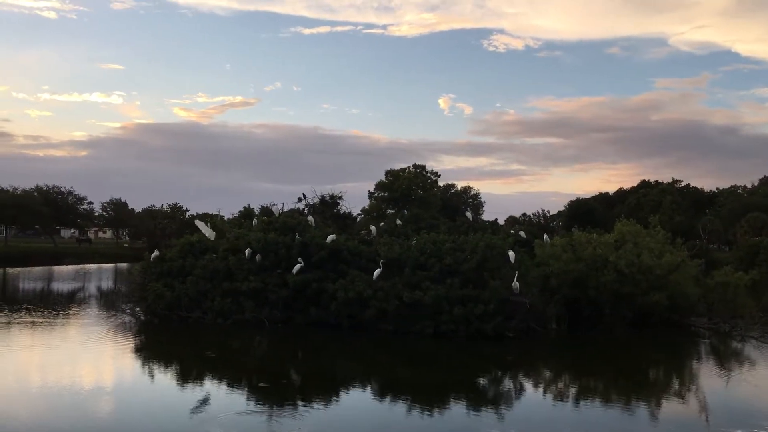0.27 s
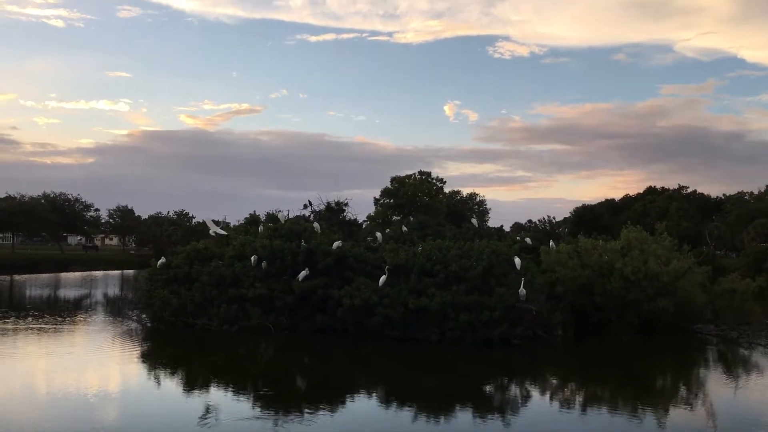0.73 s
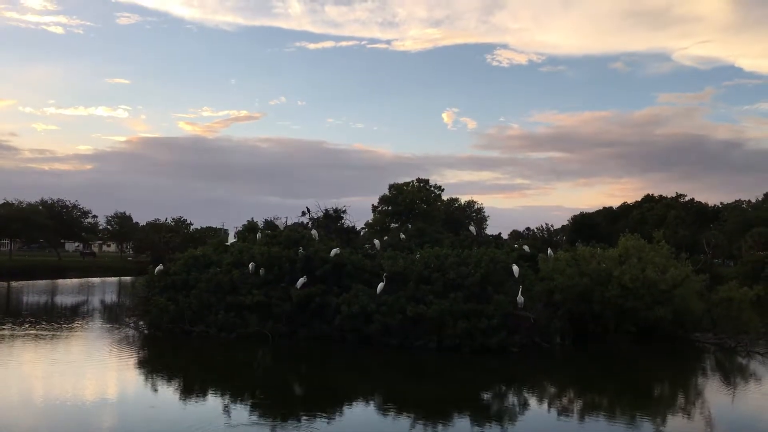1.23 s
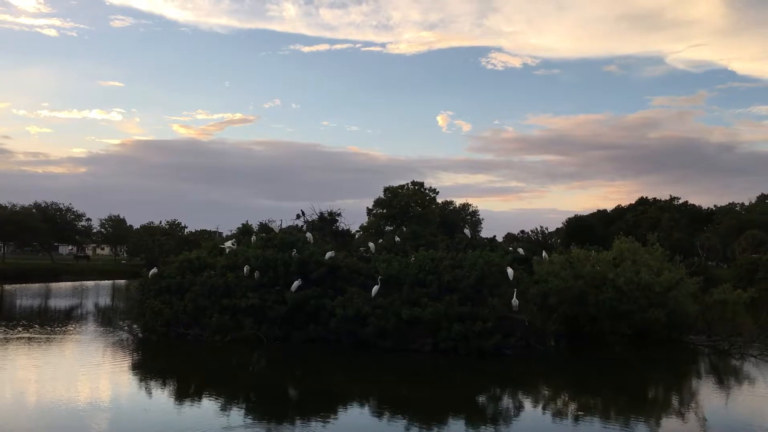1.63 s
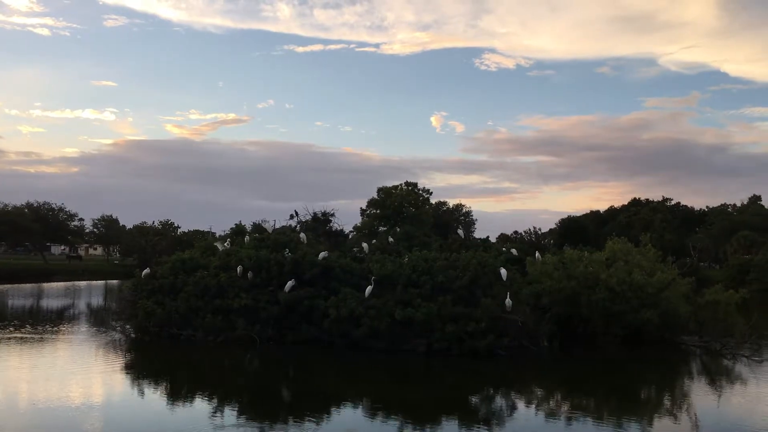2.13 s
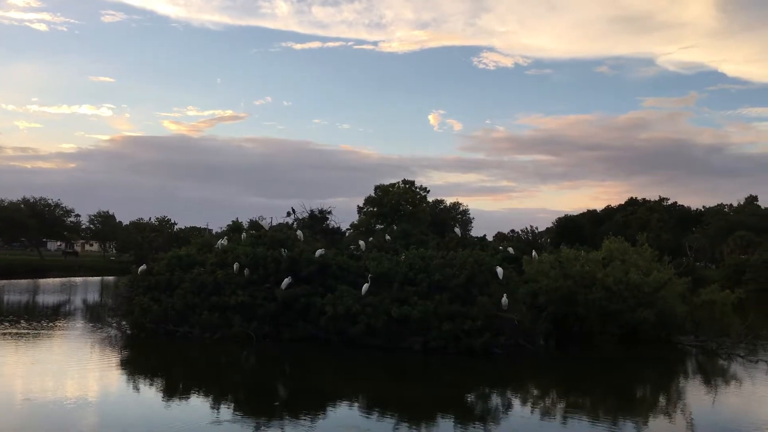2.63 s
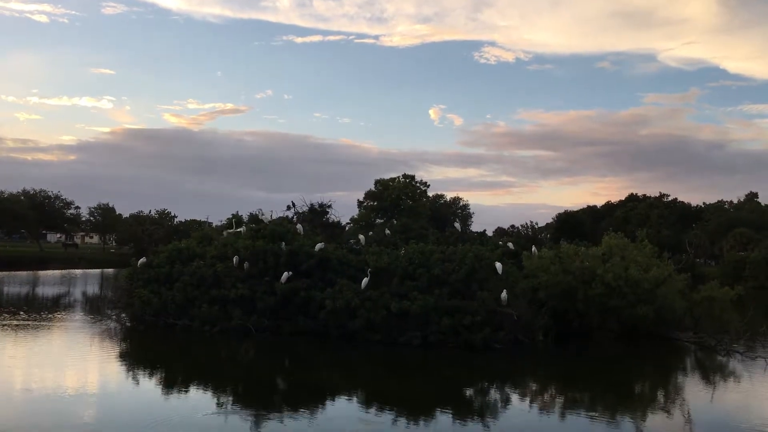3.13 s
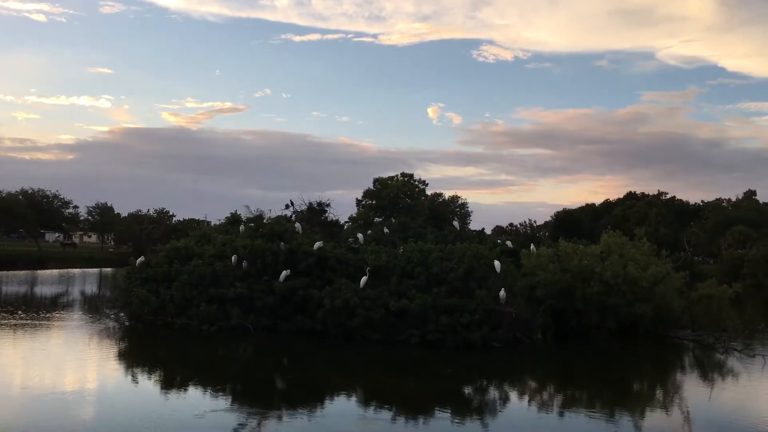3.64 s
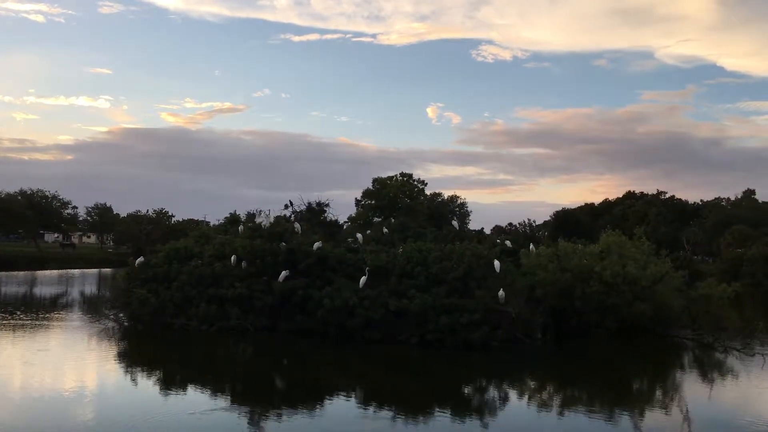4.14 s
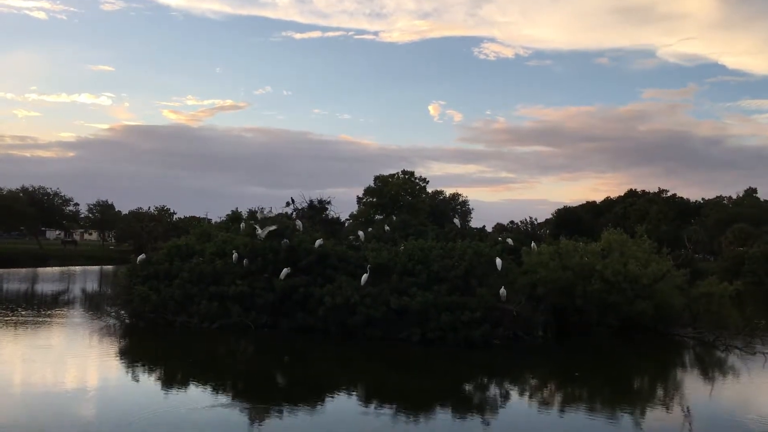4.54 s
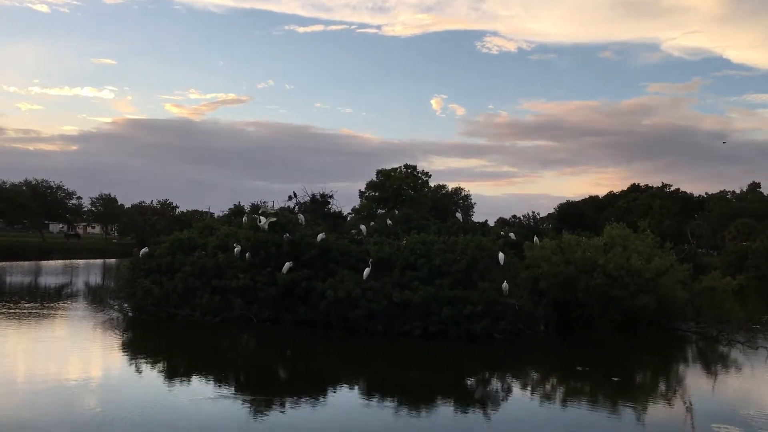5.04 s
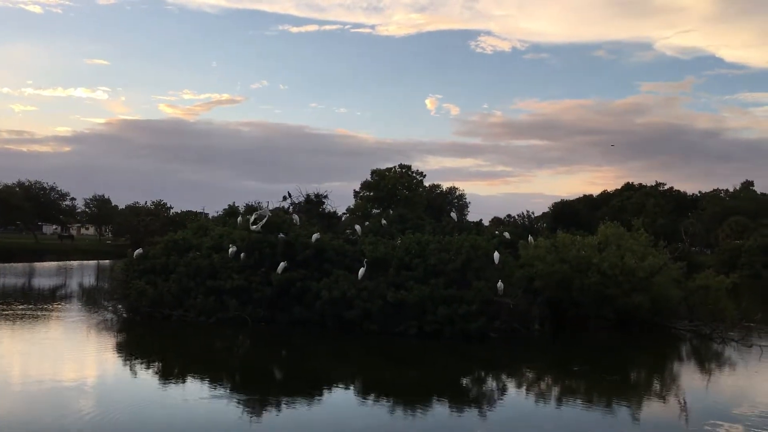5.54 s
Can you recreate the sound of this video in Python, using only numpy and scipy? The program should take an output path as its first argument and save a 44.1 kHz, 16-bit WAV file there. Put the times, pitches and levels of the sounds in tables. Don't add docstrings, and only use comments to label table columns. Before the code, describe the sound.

Clear, sliding duck whistles and squeals crowd the first half second and then thin out. From the start, heron and egret chicks on the island give short nasal honks about four a second, mixed with adult grunts, harsh rasps and beak snaps. A cricket trill flares mid-way and bills rattle soon after. Outdoor lake at dusk, soft leafy echoes, low traffic rumble, a phone microphone on the shore.

```python
import sys
import numpy as np
from scipy import signal
from scipy.fft import rfft, irfft
from scipy.io import wavfile
from scipy.ndimage import uniform_filter1d

SR = 44100
rng = np.random.default_rng(int(sys.argv[2]) if len(sys.argv) > 2 else 0)


def store_pcm(level_fs):
    pcm = np.round(np.clip(level_fs, -1, 1) * 32767).astype(np.int16)
    wavfile.write(sys.argv[1], SR, np.atleast_2d(pcm).T)


def invert_db(x):
    u = np.asarray(x, float) / 20
    return 10 ** u


N = 254898
TIME = np.arange(N) / SR


def shaped(count, hz, db):
    f = np.maximum(np.fft.rfftfreq(count, 1 / SR), 1)
    colour = invert_db(np.interp(np.log(f), np.log(hz), db))
    y = irfft(rfft(rng.standard_normal(count)) * colour, count)
    return y / y.std()


def walk(count, rate):
    k = max(int(SR / rate), 2)
    noise = rng.standard_normal(count + 4 * k)
    smooth = uniform_filter1d(uniform_filter1d(noise, k), k)[2 * k:2 * k + count]
    return smooth * np.sqrt(1.5 * k)


def waver(count, rate):
    y = walk(count, rate)
    return y - y.mean()


def read(table, fade_s=0.0063, tail_s=0.0087):
    s, *columns = np.transpose(table)
    t = np.arange(max(s[0] - fade_s, 0), s[-1] + tail_s, 1 / SR)
    fade_in = np.clip((t - s[0]) / fade_s + 1, 0, 1)
    fade_out = np.clip((s[-1] - t) / tail_s + 1, 0, 1)
    return int(t[0] * SR), (fade_in * fade_out) ** 2, [np.interp(t, s, c) for c in columns]


def add(out, start, x):
    x = x[:max(N - start, 0)]
    out[start:start + len(x)] += x


def ring(x, hz, width_hz):
    sos = signal.butter(1, [hz - width_hz / 2, hz + width_hz / 2], "band", fs=SR, output="sos")
    return signal.sosfilt(np.vstack([sos, sos]), x)


def breath(count):
    beat = np.cumsum(500 * (1 + .04 * walk(count, 120))) / SR % 1
    puff = np.exp(-beat / .06)
    air = rng.standard_normal(count) * (.12 + .5 * np.exp(-beat / .3))
    return (puff + air) * invert_db(3 * walk(count, 90))


# pitch_hz, level_db (per Hz)
DUSK_COLOUR = [(15, -48), (25, -1), (75, 5.5), (298, -10), (471, -18.5), (651, -11.5), (1180, -10),
               (1630, -14), (1970, -20), (3650, -20.5), (4910, -31.5), (5930, -35), (15600, -49)]
# time_s, level_db
FAR_CHORUS = [(0, -35), (.09, -40), (.15, -50), (.23, -40), (.36, -40), (.47, -43), (.57, -42.5),
              (.66, -55.5), (1.8, -53.5), (2.1, -66), (2.6, -59), (3.2, -59), (4, -53), (4.33, -52.5),
              (4.41, -58), (4.63, -57), (4.8, -58), (5.78, -58.5)]
# time_s, level_db
ENGINE_HUM = [(0, -59), (.3, -47), (.8, -49.5), (1.1, -59.5), (1.95, -47.5), (2.1, -56.5), (5.78, -70.5)]


def dusk():
    blur = shaped(N, *np.transpose(DUSK_COLOUR))
    chorus_db = np.interp(TIME, *np.transpose(FAR_CHORUS)) + 60
    spectrum, f, out = rfft(blur), np.fft.rfftfreq(N, 1 / SR), 0
    for low in 2 ** np.arange(4, 15):
        band = irfft(spectrum * ((f >= low) & (f < 2 * low)), N)
        flicker_db = 1.0 if low < 500 else 1.4
        chorus_share = np.interp(low, [1000, 2000, 4000, 9000], [0.091, 0.44, 0.87, 0.43])
        out = out + band * invert_db(flicker_db * walk(N, 9.6) + chorus_db * chorus_share)
    phase = 2 * np.pi * np.cumsum(103.5 * (1 + 0.014 * walk(N, 7.9))) / SR
    engine_db = np.interp(TIME, *np.transpose(ENGINE_HUM)) + 2.0 * walk(N, 4.45)
    whine = invert_db(-66) * np.sin(2 * np.pi * 297 * TIME + 1.52 * walk(N, 4.92))
    return out * invert_db(-49.5) + np.sin(phase) * invert_db(engine_db) + whine


# time_s, level_db
CRICKET_LEVEL = [(0, -48), (2.5, -75), (2.58, -56), (3.05, -57), (3.3, -78), (5.78, -56.5)]


def cricket():
    stroke = np.cumsum(27.0 * (1 + 0.0303 * walk(N, 3.43))) / SR % 1
    push = np.exp(-((stroke - .5) / .15) ** 2) * invert_db(4 * walk(N, 12))
    ticks = ring(rng.standard_normal(N), 3980, 350) * (.25 + push)
    return ticks / ticks.std() * invert_db(np.interp(TIME, *np.transpose(CRICKET_LEVEL)) - 7.5)


# start_s, level_db
CRICKET_STROKES = [(2.5399, -52), (2.5733, -47), (2.6127, -45), (2.683, -47), (2.7199, -48), (2.7833, -44),
                   (2.8561, -50), (2.8901, -52), (2.9305, -51), (2.9579, -49), (3.0093, -50), (3.0372, -46)]


def chirps():
    out, t = np.zeros(N), np.arange(0, .02, 1 / SR)
    swell = np.sin(np.pi * t / t[-1]) ** 2
    for s, db in CRICKET_STROKES:
        detune, turn = rng.standard_normal(2)
        tone = np.sin(2 * np.pi * 3980 * (1 + .015 * detune) * t + turn)
        add(out, int((s - .003) * SR), swell * tone * invert_db(db - 3.0))
    return out


# start_s, level_db
SQUABBLE = [(3.4146, -43), (3.4244, -45), (3.4535, -49), (3.5024, -57), (3.5912, -55), (3.691, -51),
            (3.6964, -50), (3.7094, -51), (3.7234, -53), (3.7374, -50), (3.7574, -50), (3.7743, -47),
            (3.7854, -50), (3.7954, -52), (3.8114, -51), (3.8294, -54), (3.8494, -56), (3.8744, -53),
            (3.9644, -61), (4.0472, -53)]
# start_s, level_db
LATE_SQUABBLE = [
    (5.3208, -48),
    (5.3861, -50),
    (5.4804, -59),
]


def rattle():
    out, t = np.zeros(N), np.arange(0, .02, 1 / SR)
    for s, db in list(SQUABBLE) + list(LATE_SQUABBLE):
        tick = rng.standard_normal(len(t)) * np.exp(-t / 0.0029)
        dry_tick = ring(tick, 6400, 3000) + .4 * ring(tick, 10000, 6000)
        add(out, int(s * SR), dry_tick / abs(dry_tick).max() * invert_db(db - 6))
    return out


# start_s, level_db
BEAK_SNAPS = [
    (1.807, -40),
    (1.817, -38),
    (1.826, -48.5),
    (3.414, -38),
    (3.692, -42),
    (3.777, -55),
]


def snaps():
    out, t = np.zeros(N), np.arange(0, .03, 1 / SR)
    for s, db in BEAK_SNAPS:
        tick = rng.standard_normal(len(t)) * np.exp(-t / 0.0023)
        bill = ring(tick, 3230, 700) + 0.46 * ring(tick, 4430, 700) + 0.32 * ring(tick, 5600, 900)
        add(out, int((s - .002) * SR), bill / abs(bill).max() * invert_db(db))
    return out


# start_s, beak_level_db, body_level_db (relative to the beak)
SHORT_RASPS = [(1.1709, -37.5, 2.5), (1.4375, -37, -6.5), (1.677, -39, 9), (1.765, -62, 22),
               (1.815, -54, 25), (1.9998, -40, 8), (2.1387, -38, 1), (2.3694, -47, 17.5), (2.552, -43, 14),
               (2.727, -65, 23), (2.8022, -50, 26.5), (3.251, -51, 11), (3.411, -37, 10), (3.454, -45, -1),
               (3.688, -41, 7), (3.774, -45, -3), (4.069, -39, 1), (4.3096, -45.5, 16.5), (4.536, -36, 6.5),
               (4.6932, -47.5, 19), (4.761, -36, 7), (4.832, -57, 22), (4.994, -38, 6), (5.156, -43, 12),
               (5.2345, -42, 9), (5.468, -44, 16), (5.657, -41, 11)]


def rasps():
    out, t = np.zeros(N), np.arange(0, .16, 1 / SR)
    shape = np.clip(t / .008, 0, 1) * np.exp(-(t / .034) ** 2)
    for s, db, body_db in SHORT_RASPS:
        air = breath(len(t))
        beak = ring(air, 5660, 966) + .5 * ring(air, 4230, 500) + 0.078 * ring(air, 12200, 3800)
        body = ring(ring(air, 3030, 2000), 3200, 2800) + .5 * ring(air, 3430, 280)
        both = beak / np.std(beak[:2000]) + invert_db(body_db - 1.5) * body / np.std(body[:2000])
        add(out, int(s * SR), shape * invert_db(db - 17.5) * both)
    return out


# start_s, length_s, level_db
LONG_HISSES = [
    (3.046, 0.029, -47),
    (4, 0.086, -48.5),
    (2.5, 0.04, -52),
    (3.69, 0.21, -51.5),
    (5.31, 0.19, -49),
]
HISS_START_DB, HISS_END_DB = -5, -8


def hisses():
    out = np.zeros(N)
    for s, length, top_db in LONG_HISSES:
        table = [(s, top_db + HISS_START_DB), (s + .3 * length, top_db), (s + length, top_db + HISS_END_DB)]
        start, gate, (db,) = read(table, fade_s=0.0082, tail_s=0.0183)
        air = breath(len(db))
        beak = ring(air, 4600, 4200) + 1.1 * ring(air, 3980, 350)
        beak = beak + 0.5 * ring(air, 4620, 280) + 0.85 * ring(air, 5600, 490)
        top = ring(air, 9100, 7700)
        add(out, start, gate * invert_db(db - 3.5) * (beak / beak.std() + invert_db(-22) * top / top.std()))
    return out


# peak_s, length_s, throat_hz, level_db
ADULT_GRUNTS = [(0.888, 0.017, 940, -54.5), (1.32, 0.099, 1065, -53.5), (2.46, 0.12, 1100, -53.5),
                (3.402, 0.065, 1030, -49.5), (3.431, 0.027, 1480, -49), (3.601, 0.04, 1145, -50.5),
                (1.731, 0.059, 1300, -52.5), (2.682, 0.073, 960, -61), (5.26, 0.019, 1930, -48.5),
                (5.312, 0.013, 1076, -42.5), (5.345, 0.17, 1134, -44.5), (5.394, 0.04, 1547, -49),
                (5.543, .04, 1000, -58), (5.763, .03, 1100, -57), (1.16, 0.048, 1120, -46),
                (0.85, 0.028, 1060, -52.5), (1.1, 0.047, 1200, -57), (0.745, 0.018, 1480, -50),
                (2.8, 0.021, 1170, -46.5), (3.79, 0.023, 1200, -49), (2.735, 0.011, 1850, -53),
                (2.2, 0.035, 1200, -56)]


def grunts():
    out = np.zeros(N)
    attack_s, start_db, fade_db_per_s, sag_hz_per_s = .025, -2, 18, 364
    for s, length, top_hz, top_db in ADULT_GRUNTS:
        end = (s + length, top_hz - sag_hz_per_s * length, top_db - fade_db_per_s * length)
        path = [(s - attack_s, top_hz, top_db + start_db), (s, top_hz, top_db), end]
        start, gate, (hz, db) = read(path)
        n = len(hz)
        flap = np.cumsum(68 * (1 + 0.22 * walk(n, 28.0))) / SR % 1
        puff = 0.6 + np.sin(np.pi * flap) ** 2 * invert_db(3.0 * walk(n, 90))
        phase = 2 * np.pi * np.cumsum(hz * (1 + .05 * walk(n, 400))) / SR
        rough = 0.18 * walk(n, 310) * np.sin(1.6 * phase) + 0.072 * walk(n, 240) * np.sin(2 * phase)
        voice = puff * (np.sin(phase) + rough)
        add(out, start, voice / voice.std() * gate * invert_db(db))
    return out


# start_s, length_s, level_db
TORN_AIR = [
    (.075, .05, -63),
    (.165, .105, -55),
    (.33, .05, -56),
    (.395, 0.081, -60),
]


def shrieks():
    out = np.zeros(N)
    for s, length, top_db in TORN_AIR:
        path = [(s, top_db + HISS_START_DB), (s + length / 2, top_db), (s + length, top_db + HISS_END_DB)]
        start, gate, (db,) = read(path)
        air = rng.standard_normal(len(db)) * invert_db(3.0 * walk(len(db), 150))
        shriek = ring(air, 5500, 5500) + 0.11 * ring(air, 12500, 4000)
        add(out, start, shriek / shriek.std() * gate * invert_db(db))
    return out


SLIDE_IN_DB, SLIDE_OUT_DB = -4, -5


def slide(s, length, top_hz, db, rise, fall, up, down):
    top_s = s + min(rise / up, .95 * length)
    drop_s = max(s + length - fall / down, top_s + .001)
    end_s = max(s + length, drop_s + .001)
    return [(s, top_hz / 2 ** rise, db + SLIDE_IN_DB), (top_s, top_hz, db), (drop_s, top_hz, db),
            (end_s, top_hz / 2 ** fall, db + SLIDE_OUT_DB)]


def soft_ends(path, db):
    soft = [SLIDE_IN_DB] + [0] * (len(path) - 2) + [SLIDE_OUT_DB]
    return [(s, hz, db + d) for (s, hz), d in zip(path, soft)]


# start_s, length_s, top_hz, level_db, rise_octaves
UP_PIPES = [(1.41, 0.174, 2958, -54, 0.38)]
UP_PEEPS = [(.455, .065, 7000, -62, .07), (2.925, .06, 2130, -60, .03), (4.11, .045, 2480, -54, .13),
            (4.124, .026, 2950, -54, .05), (4.042, .018, 4050, -54, .03), (4.015, .025, 4350, -59, .02),
            (4.408, .035, 3850, -61, .04), (4.838, .025, 2750, -60, .04), (4.36, .08, 7800, -73, .1),
            (4.295, .035, 2500, -59, .04), (4.315, .03, 3380, -59, .04)]
UP_FAR = [(1.04, .04, 2380, -65, .2), (4.57, .1, 2280, -63, .45), (4.88, .045, 2270, -64, .3),
          (5.06, .04, 2400, -67, .12)]
# start_s, length_s, top_hz, level_db, fall_octaves
DOWN_PEEPS = [
    (-.02, 0.041, 4740, -44.5, 0.18),
    (3.925, 0.034, 7000, -76, 0.16),
]
# level_db, then a path of time_s, pitch_hz
PIPED = [
    (-41, [(-.04, 3200), (.02, 3130), (.085, 3080), (.098, 2950), (.11, 2550)]),
    (-45, [(.186, 3380), (.192, 3400), (.205, 3250), (.22, 3100), (.245, 2800), (.262, 2600)]),
    (-54, [(1.04, 2520), (1.1, 2630), (1.145, 2580)]),
    (-56, [(1.245, 2820), (1.3, 2830), (1.335, 2700), (1.352, 2300)]),
    (-55, [(1.685, 2780), (1.73, 2880), (1.755, 2680)]),
]
SQUEALED = [
    (-44, [(.066, 1950), (.078, 2060), (.086, 2330), (.108, 2380)]),
    (-52, [(.112, 2650), (.13, 2500), (.14, 2250), (.156, 1550), (.163, 1330)]),
    (-44, [(.165, 1325), (.183, 1400), (.19, 1600), (.2, 1850), (.215, 2100), (.222, 2300), (.232, 2370)]),
    (-47, [(.166, 1850), (.18, 2200), (.192, 2350), (.207, 2700)]),
    (-55, [(.232, 2650), (.242, 2800), (.255, 2600), (.272, 2100), (.284, 1650)]),
    (-56, [(.332, 1950), (.342, 2150), (.352, 2350)]),
    (-55, [(.37, 2750), (.385, 2500), (.398, 1950)]),
    (-43.5, [(.388, 1600), (.398, 1870), (.409, 2000), (.415, 2200), (.427, 2370)]),
    (-53, [(.43, 2650), (.438, 2700), (.455, 2600), (.47, 2700), (.5, 2670), (.52, 2600)]),
    (-52, [(.445, 1750), (.46, 2000), (.475, 2080), (.5, 2170), (.526, 2050)]),
]
REEDED = [
    (-52, [(.158, 2700), (.172, 3220), (.188, 3400), (.2, 3300)]),
    (-51, [(.322, 2600), (.332, 3080), (.345, 3230), (.36, 3000), (.375, 2750), (.385, 2500), (.396, 2000)]),
]
THINNED = [
    (-65, [(.76, 1530), (.8, 1650), (.855, 2000), (.872, 2200)]),
    (-64, [(.88, 2050), (.895, 1930), (.92, 2000), (.95, 2150)]),
]
FAR_AWAY = [
    (-59, [(.98, 2050), (1.02, 2250), (1.045, 2500), (1.075, 2590)]),
    (-55, [(1.42, 2050), (1.45, 2550), (1.475, 2700)]),
    (-61, [(1.66, 2000), (1.675, 2350), (1.69, 2480)]),
    (-66, [(1.745, 2470), (1.757, 2350), (1.772, 1830)]),
]
PEEPED = [(-49, [(.246, 6000), (.3, 6100), (.32, 6000), (.33, 5700), (.34, 5100)]), (-51, [(.52, 2900),
          (.535, 2950), (.55, 3150), (.584, 3100)]), (-55, [(0, 5400), (.025, 5250)]), (-57, [(.172, 7400),
          (.19, 7900), (.205, 8500)]), (-55, [(.7, 2900), (.73, 2850), (.775, 2900)]), (-57, [(.94, 2750),
          (.985, 2800)]), (-55, [(5.02, 1950), (5.05, 1980)]), (-58, [(.44, 6800), (.465, 8100),
          (.5, 7900)]), (-58, [(.335, 7200), (.355, 7900)]), (-58, [(.19, 7000), (.21, 8100)]),
          (-52, [(.586, 3300), (.6, 3700), (.616, 3100)]), (-53, [(1.148, 2600), (1.167, 3100),
          (1.19, 2880), (1.235, 2820)]), (-54, [(.272, 2850), (.295, 2780)]), (-57, [(1.6, 3650),
          (1.63, 3800)]), (-54, [(1.77, 2350), (1.782, 2420), (1.8, 2300)]), (-50, [(1.822, 2300),
          (1.84, 2220)]), (-57, [(1.848, 2250), (1.86, 2200)]), (-57, [(1.745, 1800), (1.77, 1740)]),
          (-57, [(1.805, 1850), (1.845, 1700)]), (-58, [(5.097, 2080), (5.115, 2050)]),
          (-54, [(3.686, 2330), (3.7, 2280)]), (-58, [(4.6, 1620), (4.63, 1720)]), (-60, [(4.345, 3750),
          (4.36, 3650)]), (-59, [(4.35, 3450), (4.38, 3300)]), (-60, [(4.432, 3450), (4.445, 3350)]),
          (-56, [(5.235, 3450), (5.255, 3500)]), (-58, [(3.93, 1800), (3.947, 2100), (3.98, 1700)]),
          (-61, [(3.93, 3250), (3.942, 3520), (3.965, 3400)]), (-59, [(4.305, 3500), (4.325, 3750)]),
          (-49, [(5.47, 2530), (5.5, 2480)])]
PIPE, SQUEAL, PEEP = (0, -15, -17, -37), (-24, 2, -14, -24, -32, -38), (0, -27, -37, -48)
REEDY, THIN, FAR = (0, -8, -12, -38), (-22, 0, -3, -10), (-22, 0, -10, -30)


def whistles():
    out, calls = np.zeros(N), []
    quick, slow, falling = 14, 3.9, 10.5
    for rows, tones, up in ((UP_PIPES, PIPE, quick), (UP_PEEPS, PEEP, slow), (UP_FAR, FAR, slow)):
        calls += [(slide(*row, fall=.04, up=up, down=slow), tones) for row in rows]
    for s, length, top_hz, db, fall in DOWN_PEEPS:
        calls.append((slide(s, length, top_hz, db, rise=.3, fall=fall, up=quick, down=falling), PEEP))
    for rows, tones in ((PIPED, PIPE), (SQUEALED, SQUEAL), (REEDED, REEDY), (THINNED, THIN),
                        (FAR_AWAY, FAR), (PEEPED, PEEP)):
        calls += [(soft_ends(path, db), tones) for db, path in rows]
    for table, tones_db in calls:
        start, gate, (hz, db) = read(table, fade_s=0.005, tail_s=0.014)
        n = len(hz)
        hz = uniform_filter1d(hz, size=300)
        phase = 2 * np.pi * np.cumsum(hz * (1 + .008 * walk(n, 300))) / SR
        pipe = 0
        for k, tone_db in enumerate(tones_db):
            pipe = pipe + invert_db(tone_db + (1.5 + k) * waver(n, 130)) * np.sin((k + 1) * phase)
        add(out, start, np.sqrt(2) * pipe * gate * invert_db(db))
    return out


# partial_number, level_db
THROAT_COLOUR = [(1, -8), (4, 1.5), (5, 4), (6, -4), (8, -13), (11, -23), (16, -28.5)]
# start_s, length_s, pitch_hz, level_db (partial 2), brightness_db (upper partials)
CLEAR_CALLS = [
    (1.69, 0.073, 677, -51, -6.5),
    (2.31, 0.081, 747, -38.5, -14),
    (2.754, 0.088, 769, -40.5, -11.5),
    (3.232, 0.083, 751, -40.5, -9),
]
PURE_CALLS = [(3.707, 0.092, 733, -44, -9.5), (5.578, 0.078, 717, -42, -23)]
RINGING_CALLS = [(5.119, 0.064, 721, -41, -9)]
CUT_CALLS = [(1.588, 0.031, 758, -40.5, -11.5)]
FALLING_CALLS = [(1.623, 0.038, 672, -40.5, -13)]
RISING_CALLS = [(1.868, 0.064, 696.5, -44.5, -7.5), (2.588, 0.064, 717, -42.5, -10),
                (3.506, 0.064, 727, -46.5, -10)]
NASAL_CALLS = [(4.18, 0.062, 700, -46, -2), (4.464, 0.088, 613, -57.5, 8)]
HUSKY_CALLS = [(.062, 0.069, 689, -46, -6.5), (.466, 0.105, 694, -47, -6), (1.142, 0.1, 641, -47, -4.5),
               (1.402, 0.082, 647, -49, -4.5), (2.127, 0.087, 649, -47.5, -4.5),
               (2.65, 0.023, 669, -48, -8.5), (3.051, 0.083, 669, -47.5, -7.5),
               (3.57, 0.033, 720, -54.5, -2), (4.66, 0.073, 649, -47.5, -2)]
HOARSE_CALLS = [(.259, 0.08, 634.4, -51.5, -0.5), (.702, 0.1, 639.6, -50.5, -3.5),
                (.805, 0.029, 587, -51, -7.5), (.945, 0.085, 641, -51, -4), (1.989, 0.065, 620, -66.5, 12),
                (3.986, 0.07, 649, -52, -4), (4.937, 0.11, 610, -54, -3), (5.375, 0.1, 652, -48.5, -7)]
SMALL_CALLS = [(3.372, 0.052, 935, -51, -7)]
PURE, CLEAR, HUSKY, HOARSE = .05, .15, .42, .58
# calls, hoarseness, slack_pitch_factor, third_partial_db, peak_share (of the length),
# crack_db (at the peak), first_partial_db
KINDS = [(CLEAR_CALLS, CLEAR, .98, -2, .42, -10, 0), (PURE_CALLS, PURE, 1.03, 0, .4, -3, 0),
         (RINGING_CALLS, PURE, 1, -9, .45, 0, 0), (CUT_CALLS, PURE, 1.15, -9, .95, 0, 0),
         (FALLING_CALLS, CLEAR, .97, -5, .12, 0, 0), (RISING_CALLS, HUSKY / 1.3, .98, 0, .85, -3, 0),
         (NASAL_CALLS, HUSKY / 2, 1, 5, .42, -3, 0), (HUSKY_CALLS, HUSKY, 1, 2, .42, -6, 0),
         (HOARSE_CALLS, HOARSE, 1, 2, .42, -6, 0), (SMALL_CALLS, CLEAR, 1.4, 0, .6, -2, 8.5)]


def partial_db(k, rough, first_db, third_db, upper_db):
    if k == 2:
        return 0
    if k == 3:
        return third_db + 1.5 + 0.4 * upper_db
    throat_db = np.interp(k, *np.transpose(THROAT_COLOUR))
    if k == 1:
        return throat_db + first_db
    clear_db = 7 if k == 4 and rough <= CLEAR else 0
    return throat_db + upper_db - 5.5 + clear_db


def buzz(phase, rough, first_db, third_db, upper_db):
    n, voice = len(phase), 0
    for k in range(1, 17):
        noisy = rough * (.55 * k - .35) + .2 * max(k - 2, 0) * (1 - rough) + .12 * max(k - 4, 0)
        noisy = min(noisy, 1)
        spread_hz = 60 + 220 * rough + 50 * k
        breakup = walk(n, spread_hz) * np.sin(k * phase) + walk(n, spread_hz) * np.cos(k * phase)
        tone = np.sqrt(2 - 2 * noisy) * np.sin(k * phase) + np.sqrt(noisy) * breakup
        gain_db = partial_db(k, rough, first_db, third_db, upper_db)
        voice = voice + invert_db(gain_db + 2.2 * waver(n, 60)) * tone
    return voice


def honks():
    out = np.zeros(N)
    for rows, rough, slack, third_db, peak, crack_db, first_db in KINDS:
        for s, length, top_hz, top_db, upper_db in rows:
            effort = [(s, top_db - 5.5), (s + .23 * length, top_db),
                      (s + .63 * length, top_db), (s + length, top_db - 5.5)]
            start, gate, (db,) = read(effort, fade_s=.005, tail_s=.012)
            first_hz, last_hz = min(slack * 670, .97 * top_hz), min(slack * 640, .97 * top_hz)
            peak_s = s + peak * length
            arch = [(s, first_hz), (peak_s, top_hz), (s + length, last_hz)]
            _, _, (hz,) = read(arch, fade_s=.005, tail_s=.04)
            n = min(len(db), len(hz))
            hz, db, gate = uniform_filter1d(hz, size=140)[:n], db[:n], gate[:n]
            shake = 1 + (.002 + .025 * rough) * walk(n, 200)
            phase = 2 * np.pi * np.cumsum(hz * shake) / SR
            voice = buzz(phase, rough, first_db, third_db, upper_db)
            air = ring(ring(breath(n), 2474, 2660), 2474, 4420)
            air = air * invert_db(1.5 * waver(n, 132))
            air_gain = invert_db(9 + upper_db) * np.sqrt(max(rough, CLEAR))
            crack = np.exp(-(((start + np.arange(n)) / SR - peak_s) / .004) ** 2)
            voice = voice * invert_db(crack_db * crack) + air_gain * air / air.std()
            add(out, start, voice * gate * invert_db(db + 3.44 * np.sqrt(rough) * waver(n, 41.0)))
    return out


def scatter(x, t60_s):
    t = np.arange(0, .6, 1 / SR)
    echoes = shaped(len(t), [200, 1500, 5000, 16000], [-34.0, 1.5, 2.0, -1.5])
    trees = echoes * 10 ** (-3 * t / t60_s) * np.clip(t / 0.0071, 0, 1)
    return signal.fftconvolve(x, trees / np.sqrt(np.sum(trees ** 2)))[:N]


def scene():
    roost = cricket() + chirps() + rattle() + snaps() + rasps() + hisses() + grunts() + honks()
    ducks = shrieks() + whistles()
    leaves = invert_db(-11) * scatter(roost, t60_s=.13)
    overhead = invert_db(-6) * scatter(ducks, t60_s=.2)
    return (dusk() + leaves + overhead + ducks + roost)[None]


def band_limit(x):
    return signal.sosfilt(signal.butter(12, 15760, fs=SR, output="sos"), x)


def record(dry):
    trimmed = signal.sosfilt(signal.butter(4, 39, "high", fs=SR, output="sos"), dry)
    return band_limit(trimmed)


dry = scene()
out = record(dry)
store_pcm(out)
```